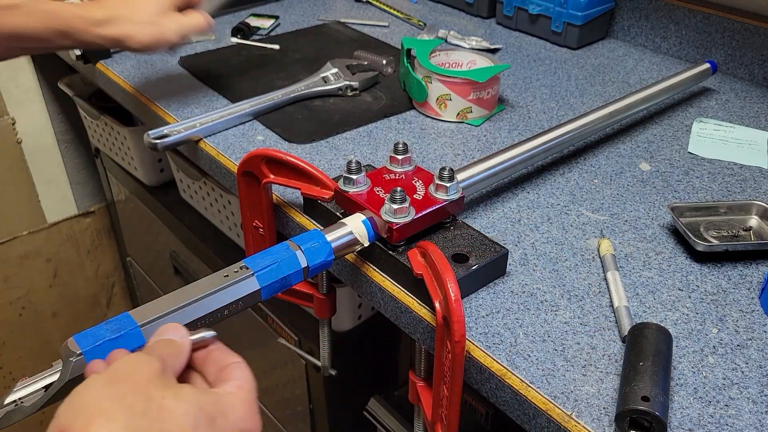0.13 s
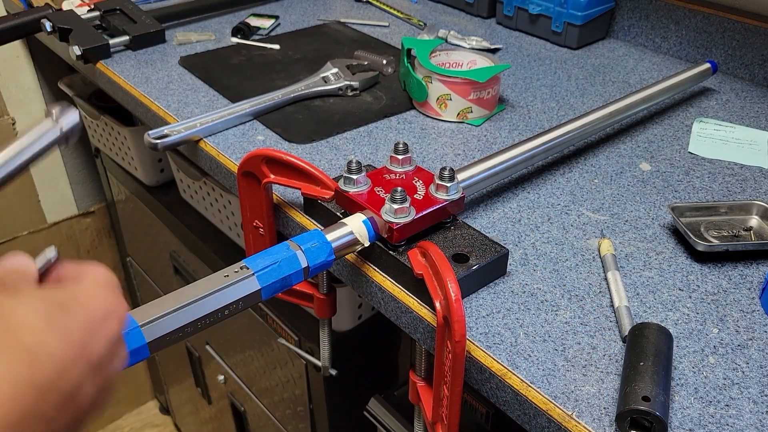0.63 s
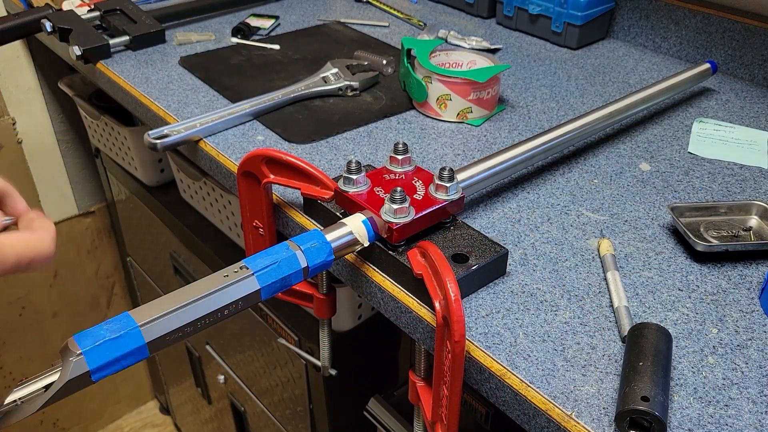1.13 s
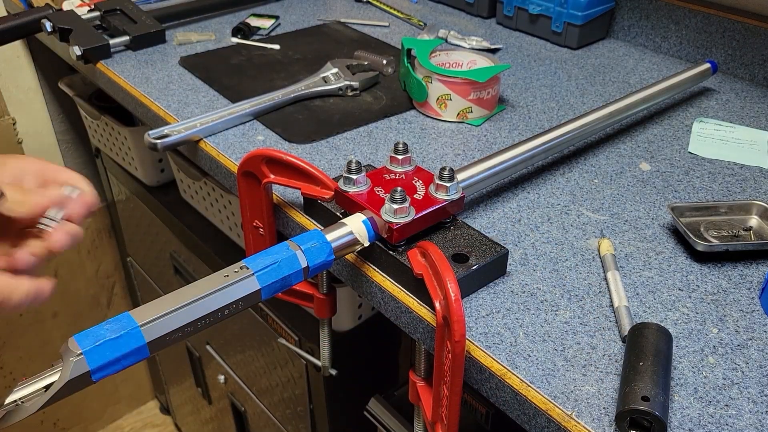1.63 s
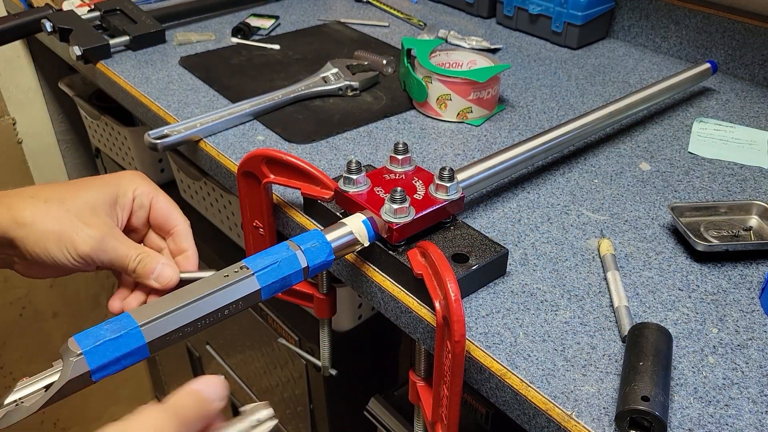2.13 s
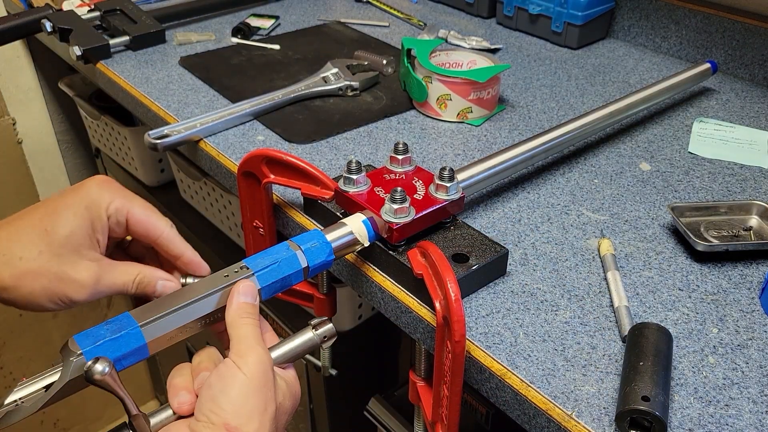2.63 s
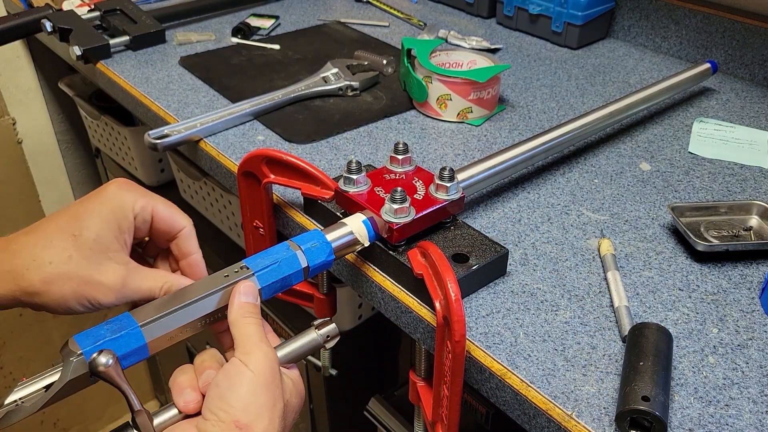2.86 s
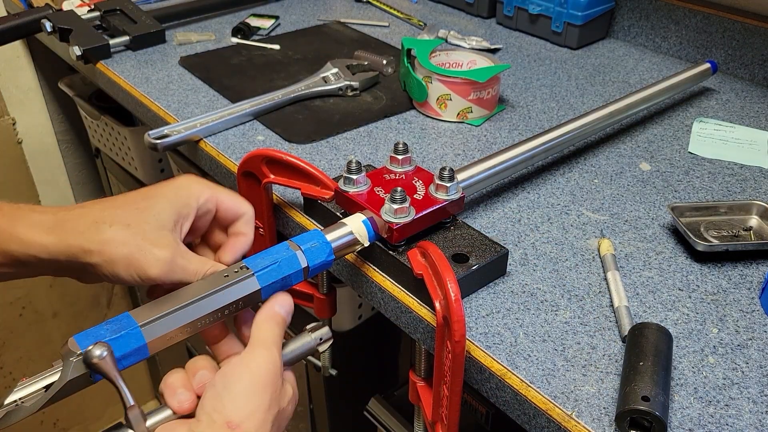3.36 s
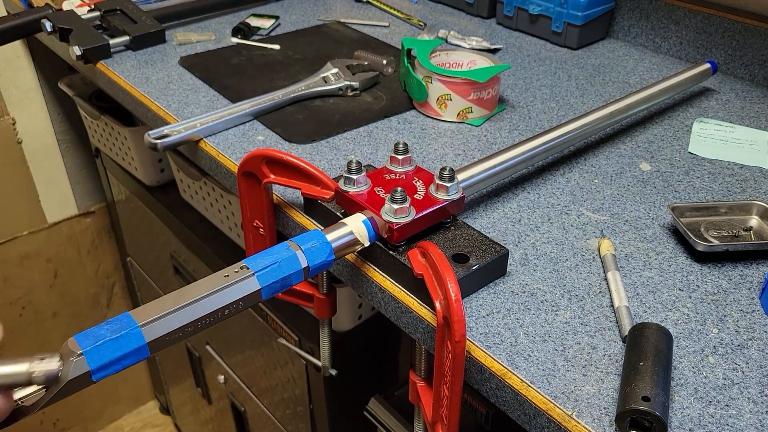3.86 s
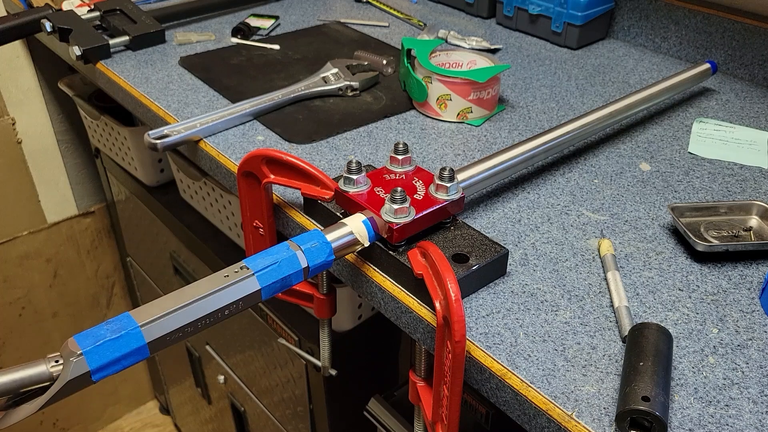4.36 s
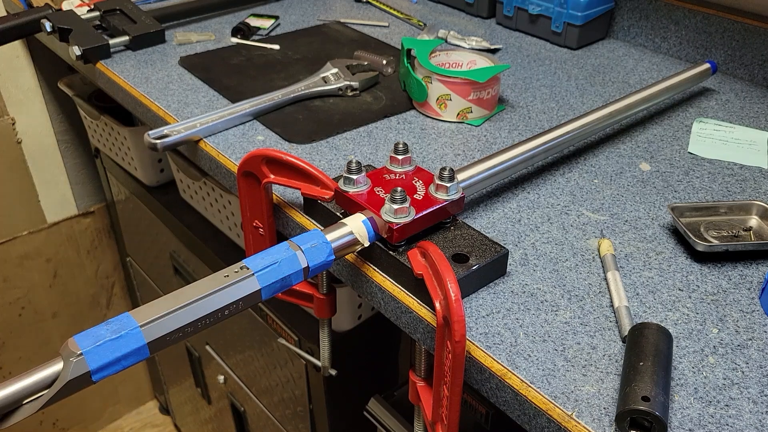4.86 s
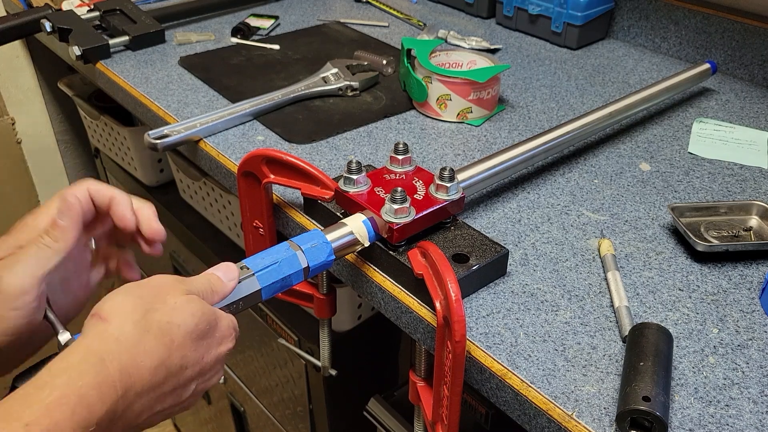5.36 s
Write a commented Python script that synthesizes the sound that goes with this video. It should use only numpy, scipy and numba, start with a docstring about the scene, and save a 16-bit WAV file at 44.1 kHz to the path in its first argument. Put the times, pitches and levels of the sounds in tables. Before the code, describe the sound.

A small room with short, dense reflections and a quiet low hum with faint hiss, heard by close stereo microphones. In the first second, tiny dry metal ticks occur around 0.1 s and more clearly at 0.8-0.9 s, with barely audible skin or cloth rubs and a dull bump near 0.77 s. Soft rubbing continues around 1.1 s, with a faint tick at 1.35 s, then near quiet. From 2.15 to 2.6 s, steel knocks on the clamped tube, strongest at 2.26, 2.37 and 2.43 s, bright and briefly ringing. Lighter taps and faint gritty scraping run from 2.8 to 3.6 s. Quiet follows until about 4.3 s. Then fuller knocks at 4.5 s and 4.8-5.1 s mix with low wooden bench thumps and sliding. A last sharp cluster of scrapes and loud clinks hits at 5.3-5.4 s, with more near 5.5 s at the end.

```python
"""Ticks in the hand and soft rubs come first; then knocks and scrapes ring steel and thump a bench.
A small steel gauge and a bolt are handled at a clamped steel tube on a wooden bench in a small room.
Noise-like contacts excite decaying modes for ticks and knocks; tiny impacts drive the same steel for scrapes.
Rubs and dull bumps are shaped noise. Two microphone ports hear it all over a quiet hum."""
import sys
import numpy as np
from scipy import signal
from scipy.fft import rfft, irfft
from scipy.io import wavfile
from scipy.ndimage import uniform_filter1d
from numba import njit

SR = 44100
rng = np.random.default_rng(int(sys.argv[2]) if len(sys.argv) > 2 else 0)


def dump(signal):
    """Clip the signal to [-1, 1] and save it as 16-bit WAV at the path in sys.argv[1]."""
    limited = np.clip(np.atleast_2d(signal).T, -1, 1)
    pcm = np.round(limited * 32767).astype(np.int16)
    wavfile.write(sys.argv[1], SR, pcm)


def amplitude_ratio(level_db):
    """Convert a level in decibels to the matching linear amplitude (field) ratio."""
    exponent = np.asarray(level_db, float) / 20
    return 10 ** exponent


N = 242792
T = np.arange(N) / SR

# Modes of the wooden bench. Each row: pitch in Hz, relative level in dB, t60 in s before cap and damping.
BENCH = [(121, -31.5, 0.39), (186, -6.5, 0.23), (244, -12, 0.042), (363.6, -10.5, 0.26), (455, -14.5, 0.15),
         (498, -4.5, 0.074), (624, -8.5, 0.1)]


def knocks():
    """Each contact point favours the steel modes near two pitches; the bench rings below."""
    # Knocks on the clamped steel. Each row: start in seconds, relative level in dB, weight (bass over
    # middle) in dB, treble over middle in dB, ring in dB, two favoured pitches in Hz, damping by the grip.
    knock_rows = [(2.154, -35, -26, 2.5, -32, 1120, 251, 0.77), (2.167, -34, -5, -2.5, -38.5, 5000, 251, 1),
                  (2.263, -18, -12, -0.5, -31.5, 5522, 4160, 1.16),
                  (2.3105, -37, -12, -18, -34.5, 5522, 5610, .6),
                  (2.37, -13, -13.5, -12, -35, 2920, 251, 1.3),
                  (2.432, -20.5, -11, -14, -40.5, 3690, 2788, 0.8),
                  (2.5968, -29.5, -6, -9.5, -42.5, 5522, 1825, 0.64),
                  (2.791, -45, -27, -11, -42, 2920, 3410, 0.98),
                  (2.8241, -36, -10.5, -30, -38.5, 2070, 2070, 1.3),
                  (2.942, -43, 1.5, -29, -35, 2920, 2304, 0.39),
                  (3.0841, -38.5, -4, -14, -53, 6050, 5522, 0.77),
                  (3.1069, -29, -12.5, -13, -43.5, 2060, 3410, 1.6),
                  (3.131, -31.5, -1, -4, -40, 1690, 3410, 0.65),
                  (3.149, -32, -9, -24, -38, 2060, 3410, 3.2),
                  (3.2534, -40.5, -1, -13.5, -30, 1690, 2970, .8),
                  (3.3007, -32.5, -9.5, -13.5, -41.5, 2860, 1690, 1.3),
                  (3.335, -35, -2, -11.5, -39, 2910, 3410, 1.9),
                  (3.4714, -54.5, -1, -21, -20, 1208, 3690, 0.98),
                  (3.5302, -43.5, 0, -8.5, -38.5, 3690, 1130, 0.73),
                  (3.5994, -61, -6, -22, -22, 1137, 1150, 0.48),
                  (4.291, -32, 13, -15.5, -1, 2900, 9270, 3.7), (4.415, -52, 15, -11, -38, 1690, 248, 2.7),
                  (4.4695, -48, 22, -20, -43.5, 1695, 9270, 4.4),
                  (4.5199, -22.5, 6, -20, -35.5, 4830, 9270, 2.2),
                  (4.526, -25, 1, -12.5, -40.5, 1703, 1208, 1.6),
                  (4.549, -43, 21, -14, -43.5, 1690, 252, 6.8),
                  (4.7693, -49.5, 19, -19, -39.5, 3000, 9270, 2.7),
                  (4.8418, -24.5, 12.5, -2.5, -37.5, 2060, 2990, 1.85),
                  (4.8525, -27.5, -12, -9.5, -43, 5522, 4920, 2.2),
                  (4.925, -33, -17, -15.5, -43, 9270, 4360, 1.6),
                  (4.968, -24.5, 8, -11, -39, 1690, 10900, 2.1),
                  (5.0535, -31.5, -2, -6, -44, 9270, 9300, 3.2),
                  (5.064, -30.5, 0.5, -18.5, -36, 2920, 1690, 3),
                  (5.0992, -34, -2, -17, -34, 9270, 1350, 2.2),
                  (5.112, -30, 8.5, -10.5, -70, 11800, 2060, 1), (5.222, -33, 0, -11, -51, 1208, 9270, 1.6),
                  (5.243, -26, 6, -25, -30, 6950, 9270, 1.15),
                  (5.2643, -29, -14, -19, -49, 4100, 4100, 1.8),
                  (5.3172, -31.5, -28.5, 6.5, -38.5, 4380, 8120, 0.25),
                  (5.3476, -19, -7, 5, -47.5, 1120, 5522, 0.81),
                  (5.3565, -13.5, 5.5, -4, -71, 2655, 1098, 1.6),
                  (5.369, -25, 12.5, -6.5, -51, 2860, 1350, 1.3),
                  (5.4626, -27.5, 2, 6, -34.5, 3000, 5040, 1.9),
                  (5.4948, -20, 0, -0.5, -41, 2750, 13400, 0.3)]
    out = np.zeros((2, N))
    modes = steel()

    def near(hz):
        octaves = np.log2(modes[:, :1] / hz)
        return np.exp(-(octaves / 0.06) ** 2)

    for s, db, weight, treble, ring_db, first_hz, second_hz, grip in knock_rows:
        favour_db = 14 * np.maximum(near(first_hz), near(second_hz)) + ring_db
        # a weightier knock wakes more bench and is fuller in the low middle
        bench_db = -36 + 0.49 * weight
        low_db = 4.3 + 0.096 * weight
        body = ring(modes, favour_db, 0.97, grip)
        body = body + ring(BENCH, bench_db, 3.1, 1.4 * grip, drift=0.045)
        add(out, s, blow(body, 3, weight, low_db, treble) * amplitude_ratio(db + 21))
    return out


def scrape():
    """Dense tiny impacts of uneven size run into the same steel and bench, damped by the sliding contact."""
    # Strokes of steel sliding on steel. Each row: start, rise and hold in seconds, relative level in dB,
    # weight (bass over middle) in dB.
    scrape_rows = [(2.776, 0.032, 0.06, -49.5, -14.5), (2.931, 0.0095, 0.11, -53, -24.5),
                   (3.041, 0.049, 0.024, -45.5, -16), (3.1, 0.0294, 0.0087, -46.5, -11),
                   (3.243, 0.062, 0.041, -48, -13.5), (3.293, 0.019, 0.047, -54.5, -10.5),
                   (3.531, 0.015, 0.011, -71.5, 18), (4.285, 0.0042, 0.062, -58, 17),
                   (4.346, 0.03, 0.11, -70.5, 24.5), (4.513, 0.0072, 0.0037, -45.5, 12),
                   (4.641, 0.05, 0.023, -98.5, 44), (4.753, 0.016, 0.037, -75.5, 24.5),
                   (4.821, 0.016, 0.061, -53, 10), (4.887, 0.051, 0.078, -60.5, 20.5),
                   (4.957, 0.0058, 0.0032, -40.5, 14.5), (5.007, 0.047, 0.031, -48.5, 11),
                   (5.093, 0.086, 0.085, -50, 2), (5.26, 0.041, 0.04, -55.5, 8),
                   (5.314, 0.0028, 0.034, -35, -22), (5.336, 0.0074, 0.033, -27, 3.5),
                   (5.481, 0.023, 0.022, -27, -18)]
    # Treble over middle in dB, one value per stroke.
    treble = np.array([-16, -31, -30, -3, -10, -8.5, -15, -23, -17, -25, -29, -21.5, -9, -8.5, 10, -7, -3,
                       13, 1, 2, -5])
    # Pitch of the air space left in the tube. Each row: time in seconds, pitch in Hz.
    air_rows = [(2.78, 3200), (2.84, 1900), (2.92, 1830), (2.94, 2080), (3.0, 1670), (3.05, 1530),
                (3.1, 1700), (3.25, 1720), (3.3, 1760), (3.4, 1480), (3.47, 1270), (4.29, 1864),
                (4.7, 1590), (4.8, 2610), (4.97, 2080), (5.3, 2330), (5.36, 3030), (5.5, 2660)]
    weight = np.transpose(scrape_rows)[4]
    fall = 670  # dB per s once the motion stops

    impacts_per_s = 4000
    impacts = (rng.random(N) < impacts_per_s / SR) * amplitude_ratio(2.17 * rng.exponential(size=N))
    grit = unit(ears(impacts, 910.0))
    # the contact catches and lets go
    catch_db, catch_per_s = 4, 70
    grit = grit * amplitude_ratio(catch_db * wander(catch_per_s))
    # the air space colours the grit as the part moves in and out
    air_hz = np.interp(T, *np.transpose(air_rows))
    grit = grit + amplitude_ratio(10.5) * np.array([hollow(ear, air_hz, 2.98) for ear in grit])

    # band limits in Hz with the extra dB of each stroke; rumble and low middle follow the weight
    bands = [(80., 210., -6 + 0.95 * weight),
             (210., 700., weight),
             (700., 1500., -0.86 + 0.28 * weight),
             (1500., 3800., 0),
             (3800., 6000., 0.68 * treble),
             (6000., 18000., treble)]
    push = 0
    for lo, hi, colour_db in bands:
        # makes up for bandwidth before the band takes its colour
        even = band(grit, lo, hi) * np.sqrt(SR / 2 / (hi - lo))
        push = push + even * strokes(scrape_rows, fall, colour_db)

    # the part shifts between three seats, each waking other modes
    seat_db, seats_per_s = 8, 9
    seats = amplitude_ratio(seat_db * np.array([wander(seats_per_s) for _ in range(3)]))
    seats = seats / np.sqrt(np.sum(seats ** 2, axis=0))
    out = 0
    for seat in seats:
        body = ring(steel(), -30, 2.6, 2.93) + ring(BENCH, -30.5, 3.9, 2.4)
        body[:, 0] += 1  # the grit itself is heard too
        out = out + signal.fftconvolve(push * seat, body, axes=1)[:, :N]
    return out * amplitude_ratio(-10)


def steel():
    """Modes of the steel as rows of pitch in Hz, relative level in dB, t60 in s before cap and damping."""
    # Pitch of each mode in Hz.
    mode_hz = [251, 1098, 1137, 1208, 1350, 1690, 1825, 2060, 2304, 2655, 2860, 2975, 3410, 3690, 4100,
               4370, 4920, 5055, 5200, 5522, 5717, 6950, 7400, 8120, 9060, 9270, 10900, 11650, 13400, 14470]
    # Each row, mode by mode: relative level in dB, t60 in seconds before cap and damping.
    mode_ring = [(-1, 0.47), (-30.5, 0.098), (-12.5, 0.26), (-10, 0.87), (-6, 0.14), (-3, 0.052),
                 (-3.5, 0.053), (4.5, 0.024), (-8.5, 0.067), (-26, 0.01), (-18, 0.029), (-0.5, 0.067),
                 (-9.5, 0.19), (-14, 0.11), (-9, 0.074), (-14.5, 0.14), (-5, 0.17), (-21, 0.13), (-8, 0.17),
                 (-3, 0.11), (-12.5, 0.054), (-8, 0.23), (-6.5, 0.11), (-10.5, 0.052), (-16.5, 0.13),
                 (4, 0.13), (-9.5, .04), (-16, .07), (1, 0.096), (-16, .1)]
    return np.column_stack([mode_hz, mode_ring])


def ticks():
    """The small part clicks against the bolt: a crack and a few very short rings."""
    # Light ticks in the hand. Each row: start in seconds, relative level in dB, treble over middle in dB,
    # ring pitch in Hz, relative ring level in dB.
    tick_rows = [(0.057, -39, 8.5, 10300, -35), (0.0966, -25, -2.5, 3070, 12.5),
                 (0.104, -37.5, 2.5, 1750, 7), (0.108, -38.5, -2, 5500, 12), (0.483, -57.5, -16, 2260, 8.5),
                 (0.515, -72, 13, 3080, 5), (0.7972, -36, 12, 4270, 21), (0.8968, -18, -2, 3240, 3),
                 (0.9006, -20, -5.5, 3800, 10), (0.907, -39, -2, 3240, 12), (1.352, -48, -9.5, 4130, 14)]
    low_db, bass_db = 1.5, 7.0  # over the middle, ahead of the band-passes
    pan_db = np.array([[1], [-1]]) / 2  # left 1 dB over right
    out = np.zeros((2, N))
    for s, db, treble, hz, ring_db in tick_rows:
        body = ring([(hz, ring_db, .005)] * 2, -27.0, 2.21, 0.56, drift=0.034)
        tick = blow(body, 0.3, bass_db, low_db, treble)
        # little is left below the ring
        thin = band(tick, min(0.68 * hz, 2600.), 19845.)
        thin = band(thin, min(0.73 * hz, 2600.), 19845.)
        tick = thin + amplitude_ratio(-13.5) * tick
        add(out, s, tick * amplitude_ratio(db + 15.0 + pan_db))
    return out


def rub():
    """Skin and cloth brushing over metal: smooth broad hiss in two bands."""
    # Each row: start, rise and hold in seconds, relative level in dB, treble in dB over the lower band.
    rub_rows = [(0.0, 0.0018, 0.038, -68, 0), (0.21, 0.036, 0.039, -61, -36),
                (0.478, 0.02, 0.07, -74, -9.5), (0.551, 0.016, 0.021, -63.5, -13),
                (0.997, 0.027, 0.018, -62.5, -13), (1.047, 0.024, 0.034, -71, 0),
                (1.133, 0.054, 0.056, -55.5, -4.5)]
    fall = 2900  # dB per s once the motion stops
    split_hz = 5500.
    low = unit(band(ears(np.ones(N), 800.), 1020.0, split_hz))
    high = unit(band(ears(np.ones(N), 800.), split_hz, 19845.0))
    treble = np.array(rub_rows)[:, -1]
    return low * strokes(rub_rows, fall, 0) + high * strokes(rub_rows, fall, treble)


def bumps():
    """A hand bumps the bench dully: soft pushes of noise in three low bands; the upper bass dies first."""
    # Each row: start, rise and hold in seconds, relative level in dB, upper bass in dB over the bass.
    bump_rows = [(0.439, 0.022, 0.035, -55, -32), (0.767, 0.0015, 0.041, -39, -15.5),
                 (1.13, 0.023, 0.0089, -48.5, -47), (3.083, 0.0073, 0.049, -48, -4),
                 (2.264, 0.0082, 0.011, -34, -48), (2.37, 0.0035, 0.012, -36, 0),
                 (4.512, 0.0081, 0.036, -29.5, -16), (4.55, 0.012, 0.016, -31.5, -18),
                 (4.776, 0.018, 0.011, -30.5, -27), (4.882, 0.0075, 0.039, -22.5, -22),
                 (4.946, 0.0086, 0.045, -24.5, -16), (5.21, 0.016, 0.037, -32, -13)]
    fall = 470  # dB per s once the push stops
    shake = ears(np.ones(N), 1500.)
    bass = unit(band(shake, 130.0, 210.0)) * strokes(bump_rows, fall, 0)
    deep = amplitude_ratio(-10) * unit(band(shake, 45.0, 110.0)) * strokes(bump_rows, 0.6 * fall, 0)
    short_rows = [(s, rise, 0.4 * hold, db, up) for s, rise, hold, db, up in bump_rows]
    upper_db = np.array(bump_rows)[:, -1]
    upper = unit(band(shake, 380.0, 610.0)) * strokes(short_rows, fall, upper_db)
    return bass + deep + upper


def room(dry, wet_db):
    """Near walls answer with a dense tail that loses its treble first."""
    # Decay of the tail. Each row: pitch in Hz, t60 in seconds ahead of the final fade.
    decay_rows = [(100, 0.43), (1000, 0.3), (5000, 0.22), (15000, 0.22)]
    t = np.arange(16384) / SR
    fade = np.cos(np.pi / 2 * t / t[-1])
    noise, tail = ears(np.ones(len(t)), 500.0), 0
    hz, t60 = np.transpose(decay_rows)
    for centre in 180 * 2. ** np.arange(7):  # octave bands, Hz
        decay = np.interp(np.log(centre), np.log(hz), t60)
        octave = band(noise, centre / np.sqrt(2), centre * np.sqrt(2))
        tail = tail + octave * np.exp(-np.log(1000) * t / decay)
    tail = tail * np.clip((t - .002) / 0.0035, 0, 1)  # first echoes come a few ms late
    # flatten the broad spectrum of the noise tail
    spectrum = rfft(tail * fade)
    tail = irfft(spectrum / np.sqrt(uniform_filter1d(np.abs(spectrum) ** 2, size=20)))
    tail = signal.sosfilt(signal.butter(2, 150., "highpass", fs=SR, output="sos"), tail)
    tail = tail * fade
    tail = tail / np.sqrt(np.sum(tail ** 2) / 2)
    mono = dry.mean(axis=0)[None]
    return dry + amplitude_ratio(wet_db) * signal.fftconvolve(mono, tail, axes=1)[:, :N]


def hum():
    """Steady room rumble and microphone hiss, as filtered noise."""
    # Colour of the background. Each row: pitch in Hz, relative density in dB per Hz.
    hum_colour = [(20, 0.5), (50, -11), (75, -3), (115, 7), (200, -3.5), (400, -10), (800, -13.5),
                  (1500, -23.5), (3500, -28), (4800, -24.5), (6500, -23), (8000, -35), (13000, -30),
                  (16000, -29.5)]
    return amplitude_ratio(-64) * unit(shape(ears(np.ones(N), 250.0), hum_colour))


def blow(body, length_ms, bass_db, low_db, treble_db):
    """A rattling contact of even spectrum excites the body and cracks broadly on its own."""
    # Centres of bass, low middle, middle and treble in Hz.
    centres_hz = [260, 1240, 3600, 9500]
    t = np.arange(512) / SR
    spectrum = rfft(ears(np.exp(-t / (length_ms / 1000)), 820.0))
    contact = irfft(spectrum / np.abs(spectrum))
    # a small contact radiates no bass by itself
    click = 1. * (np.arange(body.shape[1]) == 0)
    crack = band(click, 1400.0, 19845.0)
    sound = signal.fftconvolve(contact, body + crack, axes=1)
    # even out the energy of the onset around the middle
    onset = band(sound[:, :len(t)], 2230.0, 5270.0)
    sound = sound / np.sqrt(np.sum(onset ** 2))
    colour = list(zip(centres_hz, (bass_db, low_db, 0, treble_db)))
    return shape(sound, [(60, bass_db - 11.5)] + colour)


def ring(modes, extra_db, scatter_db, damping, drift=1 / 500):
    """Stereo response of a body; each mode has its own phase at the two ports, more unlike at high pitch."""
    # every mode has a faster dying neighbour whose pitch changes with the contact
    neighbour_db, neighbour_apart, neighbour_t60_share = -1, .025, .35
    longest_t60 = .3  # s, before damping
    hz, db, t60 = np.transpose(modes)[:, :, None]
    chance = rng.standard_normal((3, 2 * len(modes), 1))
    db = db + extra_db
    spread = np.repeat([drift, drift + neighbour_apart], len(modes))[:, None]
    hz = np.vstack([hz, hz]) * (1 + spread * chance[2])
    size = amplitude_ratio(np.vstack([db, db + neighbour_db]) + scatter_db * chance[0])
    t60 = np.vstack([t60, t60 * neighbour_t60_share])
    t60 = np.minimum(t60, longest_t60) / damping
    t = np.arange(10922) / SR
    swing = np.exp((2j * np.pi * hz - np.log(1000) / t60) * t)
    apart = np.clip((hz / 1000) ** 2, 0, 1.8) * chance[1]  # radians between the ports
    ports = size * np.exp(1j * apart * np.array([.5, -.5]))
    return (ports.T @ swing).imag


@njit
def hollow(x, hz, sharpness):
    """Resonant band-pass whose centre moves, gain 1 at the centre."""
    y, b, l = np.empty(len(x)), 0., 0.  # b and l: band and low states
    for i in range(len(x)):
        g, k = np.tan(np.pi * hz[i] / SR), 1 / sharpness
        v = (b + g * (x[i] - l)) / (1 + g * (g + k))
        b, l, y[i] = 2 * v - b, l + 2 * g * v, k * v
    return y


def strokes(rows, fall, colour_db):
    """Level over time of a table of strokes: rise, hold, fall; each stroke has its own extra dB."""
    power = np.zeros(N)
    for (s, rise, hold, db, _), extra in zip(rows, colour_db + np.zeros(len(rows))):
        start = int(s * SR)
        t = T[start:int((s + 1) * SR)] - s
        fallen_db = fall * np.maximum(t - rise - hold, 0)
        size = np.clip(t / rise, 0, 1) * amplitude_ratio(db + extra - fallen_db)
        power[start:start + len(t)] += size ** 2
    return np.sqrt(power)


def wander(per_s):
    """Random levels held 1 / per_s seconds with softened steps."""
    hold = SR // per_s
    steps = np.repeat(rng.standard_normal(N // hold + 1), hold)
    return uniform_filter1d(steps, hold // 4)[:N]


def ears(envelope, alike_hz):
    """Two noises under one envelope, the same in the bass and unrelated in the treble."""
    mid, side = rng.standard_normal((2, len(envelope))) * envelope
    side = signal.sosfilt(signal.butter(2, alike_hz, "highpass", fs=SR, output="sos"), side)
    return (mid + np.array([[1], [-1]]) * side) / np.sqrt(2)


def shape(x, points):
    """Causal minimum-phase filter through (Hz, dB) points joined on a log axis."""
    hz, db = np.transpose(points)
    size = 4096
    f = np.maximum(np.fft.rfftfreq(size, 1 / SR), 1)
    gain = amplitude_ratio(np.interp(np.log(f), np.log(hz), db))
    # folding the cepstrum makes the response causal
    cepstrum = irfft(np.log(gain), size)
    cepstrum[1:size // 2] *= 2
    cepstrum[size // 2 + 1:] = 0
    response = irfft(np.exp(rfft(cepstrum)), size)
    return signal.fftconvolve(x, response[None], axes=1)[:, :x.shape[1]]


def unit(x):
    """Scale to rms 1."""
    return x / np.sqrt(np.mean(x ** 2))


def band(x, lo_hz, hi_hz):
    """Band-pass with gentle edges."""
    return signal.sosfilt(signal.butter(2, [lo_hz, hi_hz], "bandpass", fs=SR, output="sos"), x)


def add(out, s, sound):
    """Mix a sound in at time s."""
    i = int(s * SR)
    out[:, i:i + sound.shape[1]] += sound[:, :N - i]


def scene():
    """Contacts sound in the room; bumps join them without it at the two microphone ports, over the hum."""
    # Tone of the microphone. Each row: pitch in Hz, gain in dB.
    microphone = [(30, -7.5), (65, -14.5), (120, -3), (700, 1), (5000, 2.5), (6300, 0.5), (11000, -1),
                  (15000, -6), (15900, -15), (16700, -33.5)]
    # Balance of the ports. Each row: pitch in Hz, left over right in dB.
    balance = [(100, -1.5), (1000, -2.5), (4000, -2), (8000, -1.5), (14000, 5)]
    near = knocks() + scrape() + ticks() + rub()
    heard = shape(room(near, 2.96) + bumps(), microphone)
    ports = []
    for ear, side in zip(heard, (.5, -.5)):
        ports.append(shape(ear[None], [(hz, side * db) for hz, db in balance]))
    return np.vstack(ports) + hum()


def top_cut(x):
    """Nothing passes above the cut-off."""
    return signal.sosfilt(signal.butter(12, 16530, fs=SR, output="sos"), x)


def record(dry):
    """The recorder takes the finished mix."""
    return top_cut(dry)


dry = scene()
out = record(dry)
dump(out)
```